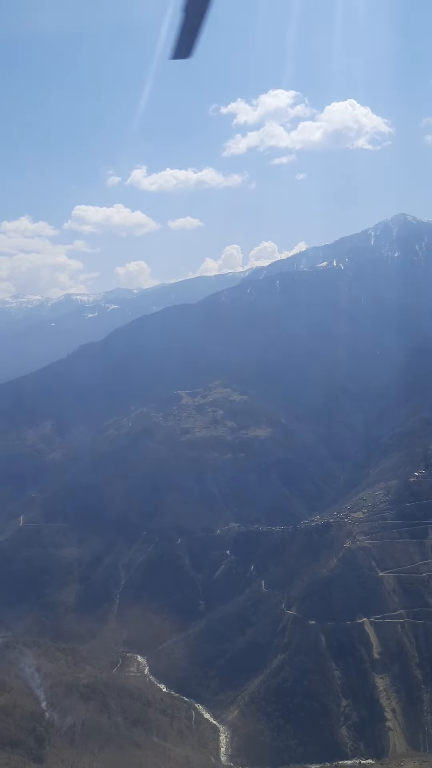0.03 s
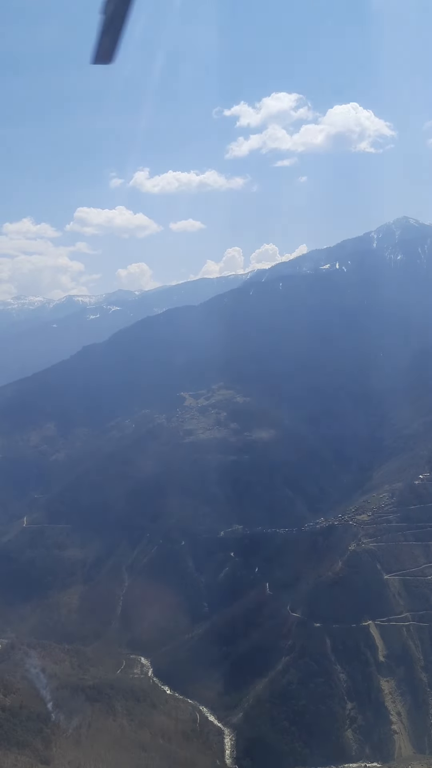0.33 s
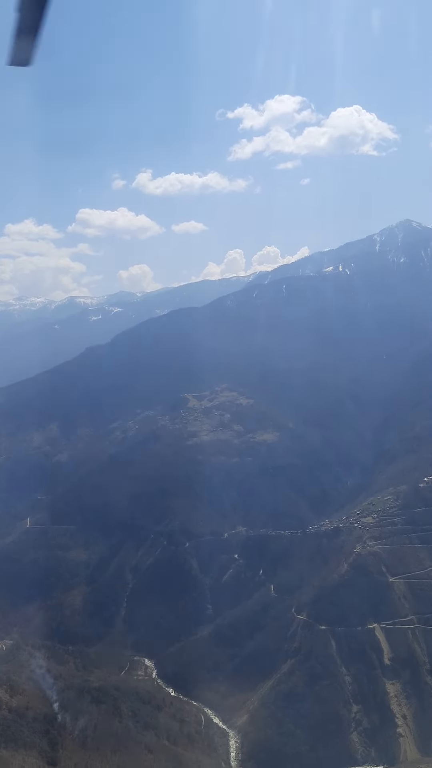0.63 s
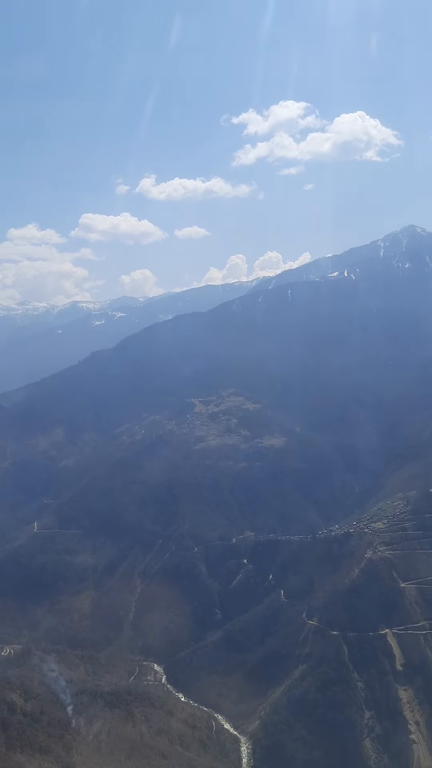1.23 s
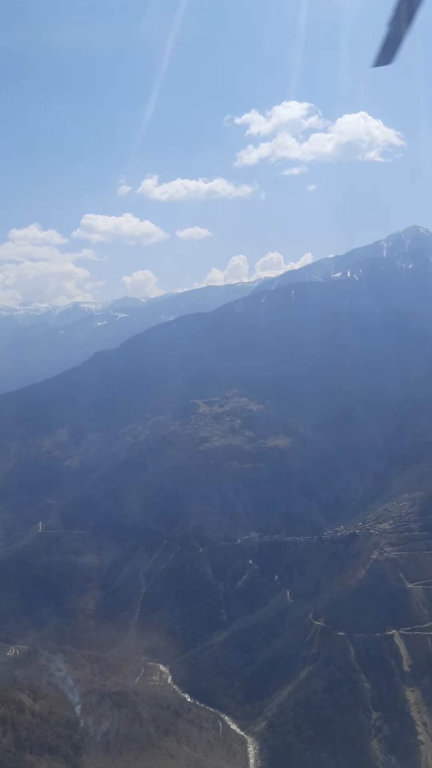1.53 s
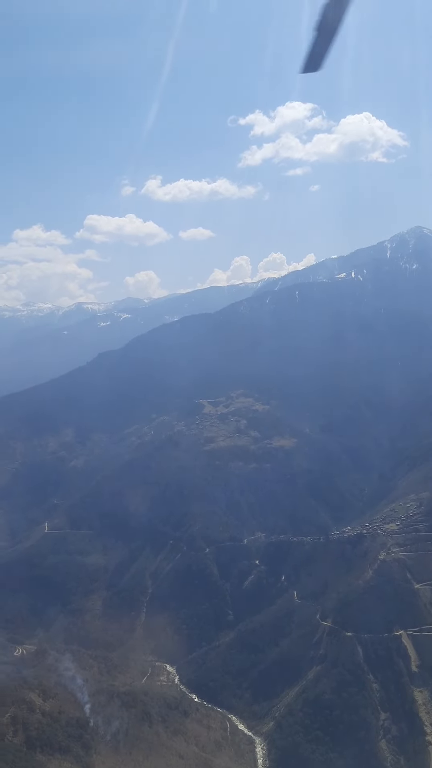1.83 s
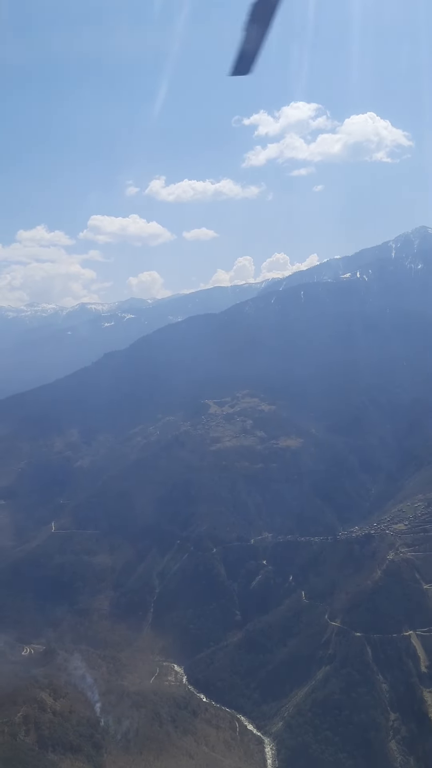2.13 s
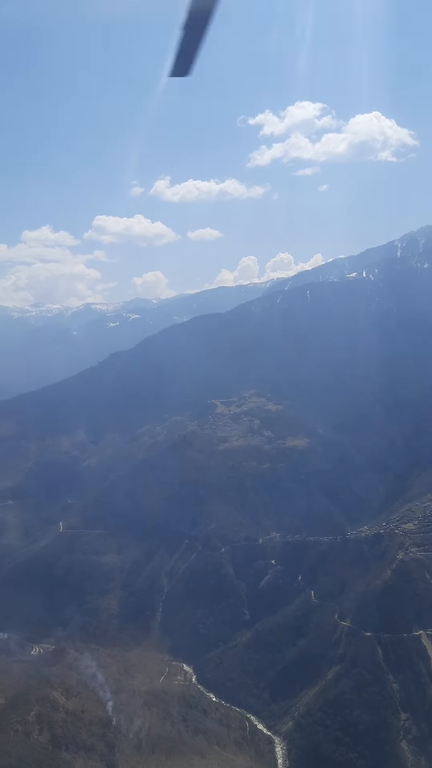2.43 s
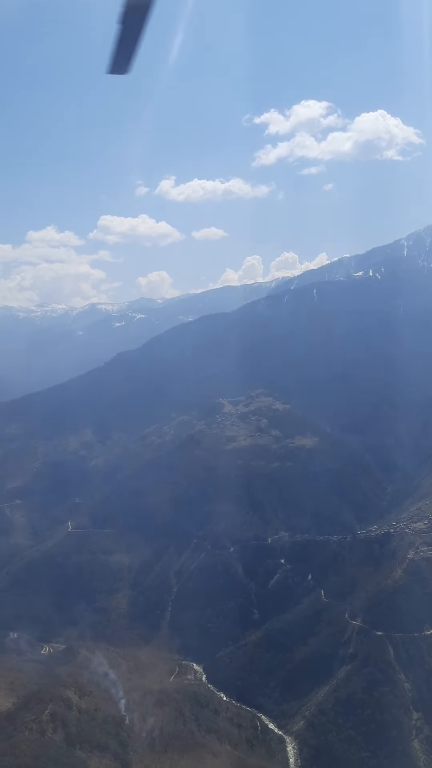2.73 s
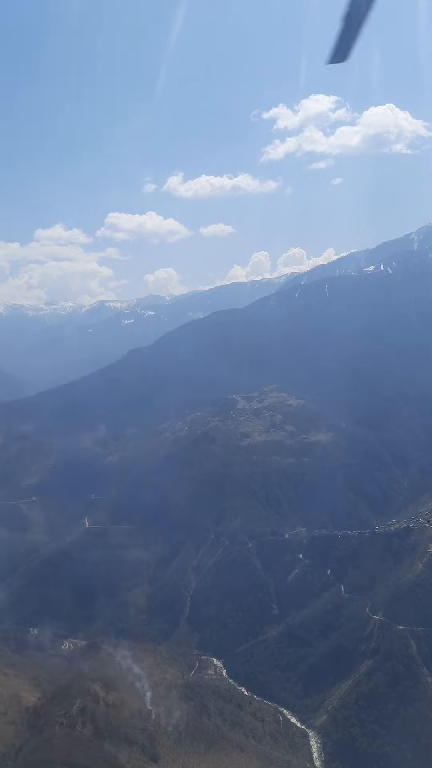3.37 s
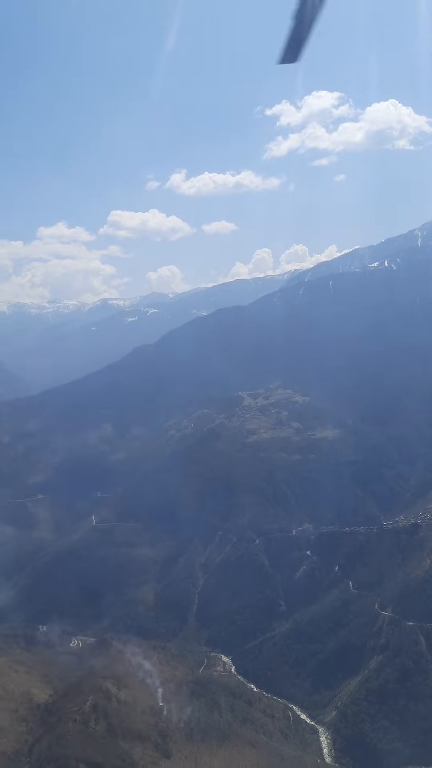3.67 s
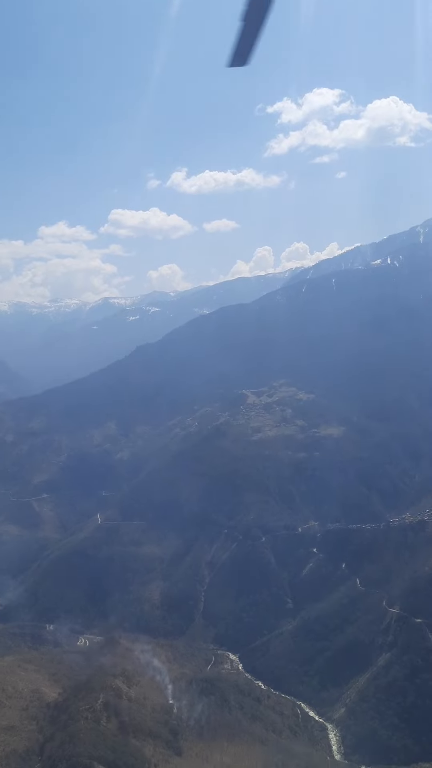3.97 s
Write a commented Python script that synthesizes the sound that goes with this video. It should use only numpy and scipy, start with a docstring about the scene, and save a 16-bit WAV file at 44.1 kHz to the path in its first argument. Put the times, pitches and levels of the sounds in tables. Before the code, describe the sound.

Helicopter rotor and engine noise fills the cabin throughout, with rapid blade beats, a deep airflow roar and thin turbine whistles. A constant high whine is strongest at first, then eases as the rotor speeds up a little.

```python
"""A helicopter's main rotor, heard from the cabin in level flight. It throbs, and each blade adds a slap
and a swish. The rotor drive whines loudly and speeds up a little. Airflow roars on the fuselage,
the cabin drones, the gears hum and pulse, and the turbine adds thin whistles that drift with its
own speed."""
import sys
import numpy as np
from scipy.fft import rfft, irfft, next_fast_len
from scipy.io import wavfile
from scipy.ndimage import map_coordinates

SR = 44100
rng = np.random.default_rng(int(sys.argv[2]) if len(sys.argv) > 2 else 0)


def transcribe(u):
    """Save the signal u as a 16-bit wav file named by the first command-line argument.

    u: samples, shape (n,) or (channels, n), limited to [-1, 1]; the rate is SR.
    q: integer samples, one column per channel.
    """
    v = np.clip(np.atleast_2d(u).T, -1, 1)
    q = np.round(v * 32767).astype(np.int16)
    wavfile.write(sys.argv[1], SR, q)


N = 176400

SPEED_UP_S = (1.7, 2.5)  # start, end of the drive tones' level change
# rotor drive whine, tracks shaft speed: time_s, pitch_hz
DRIVE_PITCH = [(0, 2188), (.6, 2188), (1.1, 2182), (1.6, 2188), (2.1, 2193), (2.6, 2203), (3.1, 2208),
               (3.6, 2201), (4, 2210)]


def main_rotor():
    """Blade-pass harmonics, plus a pressure pulse and a swish of air per blade."""
    # throb: harmonic, level_db
    harmonics = [(2, -61), (3, -44.5), (4, -28), (5, -28.5), (6, -32), (7, -28), (8, -27.5), (9, -32),
                 (10, -41), (11, -37.5), (12, -43), (13, -29.5)]
    # swish spectrum: freq_hz, density_db
    swish_spectrum = [(40, -56), (100, -30), (250, -22), (350, 1.5), (450, 12), (560, -13.5), (800, -3),
                      (2000, -50), (5000, -120)]
    # slap and swish envelope: time_s, gain_db
    blade_gain = [(0, 1), (.8, 1), (1.5, 1.5), (2.5, .5), (3.2, -.5), (4, -1.5)]
    start_blade_hz, first_slap_s, swish_half_width_s = 16.255, .033, .006
    slap_hz, slap_width_s, jitter_s, scatter_db = 395, .0042, .0005, 1.3
    passes = (drive_time() - first_slap_s) * start_blade_hz
    throb = sum(tone(2 * np.pi * k * passes + .29 * wobble(4.26), db - wobble(6.1), -2.4, -.15)
                for k, db in harmonics)
    blade = np.round(passes).astype(int)
    from_blade_s = (passes - blade) / start_blade_hz
    early, size = rng.standard_normal((N // 1000, 2))[blade].T  # one draw per blade
    window = np.exp(-(from_blade_s / slap_width_s) ** 2)
    burst = window * np.sin(2 * np.pi * slap_hz * (from_blade_s + jitter_s * early))
    slap = amp(-16.5 + scatter_db * size) * burst
    swish = amp(-32) * unit(cabin_noise(swish_spectrum) / (1 + (from_blade_s / swish_half_width_s) ** 2))
    return throb + amp(curve(blade_gain)) * (slap + swish)


def drive_whine():
    """Loud whine and side tones locked to shaft speed; most side tones swell as it rises."""
    # whine envelope: time_s, level_db
    whine_level = [(0, -27), (.6, -28), (1.15, -29), (1.6, -26), (1.95, -28), (2.4, -33.5), (2.7, -36.5),
                   (3.15, -37.5), (3.53, -32), (3.8, -37), (4, -41.5)]
    # whine balance: time_s, left_minus_right_db
    whine_pan = [(0, 0.5), (.9, -2), (1.6, 0.5), (2.5, -2.5), (3.1, -9), (3.53, 0), (4, -15)]
    # tones around the speed-up: start_hz, before_db, after_db, pan_db, ear_phase_rad
    side_tones = [(506.5, -42, -35, 0, .3), (689.3, -42, -36, -1.5, .5), (1013, -46, -48, -9, 1.5),
                  (2718, -59, -48.5, 0, .5), (2775, -52, -46, 0, .5), (3386, -56, -46.5, 2, 1.2),
                  (3470, -58, -55, 0, 1)]
    pitch_hz = curve(DRIVE_PITCH)
    whine = machine_tone(pitch_hz, curve(whine_level), curve(whine_pan), .034,
                         swing_db=.6, wander_rad=.06, flutter=.03)
    return whine + sum(
        machine_tone(hz * pitch_hz / pitch_hz[0], ramp(SPEED_UP_S, [before, after]), pan, ear_phase,
                     swing_db=1.5, wander_rad=.27, flutter=.41 * np.sqrt(hz / pitch_hz[0]))
        for hz, before, after, pan, ear_phase in side_tones)


def airflow():
    """Turbulent roar on the fuselage and a smooth hiss."""
    # roar spectrum: freq_hz, density_db
    roar_spectrum = [(15, -40), (30, -34), (38, -17), (48, -5), (70, -8.5), (115, 1), (165, -5), (215, -4),
                     (290, -8), (350, -13), (450, -18.5), (560, -19.5), (700, -22.5), (1000, -27.5),
                     (1600, -46), (5000, -120)]
    # roar envelope: time_s, level_db
    roar_level = [(0, -15), (.7, -15.5), (1.3, -13.5), (2, -15.5), (2.7, -13.7), (3.2, -15), (4, -15)]
    # hiss spectrum: freq_hz, density_db
    hiss_spectrum = [(500, -23), (900, 4), (1500, -1), (1800, -1.5), (2150, 3), (2650, -4.5), (3200, -6),
                     (4100, -7.5), (5500, -18), (7200, -17), (9800, -24), (11000, -15.5), (13500, -27),
                     (15000, -26), (15700, -34)]
    left_lag_s = .00014
    roar = amp(curve(roar_level) + .55 * wobble(22.25)) * cabin_noise(roar_spectrum)
    roar = filtered(roar, lambda hz: np.exp(np.outer([-1j, 1j], np.pi * hz * left_lag_s)))
    hiss = amp(-33 + .64 * wobble(12)) * cabin_noise(hiss_spectrum)
    return roar + hiss


def cabin_drone():
    """Two low tones that swell and recede."""
    # drone envelopes: time_s, lower_db, upper_db
    envelopes = [(0, -29.5, -36), (.8, -25, -27), (1.6, -24, -26.5), (2.6, -25.5, -23.5),
                 (3.1, -31.5, -35.5), (4, -27, -32)]
    pitches_hz = (255.1, 293.2)
    time_s, *levels_db = np.transpose(envelopes)
    return sum(machine_tone(hz, ramp(time_s, db), 0, .69, swing_db=1.2, wander_rad=.63, flutter=.13)
               for hz, db in zip(pitches_hz, levels_db))


def gearbox():
    """Gear and tail rotor hums, with a slowly beating mesh tone."""
    # hums: pitch_hz, level_db, pan_db, ear_phase_rad
    hums = [(57, -36, -2, 0), (114, -32.5, -2, 0), (930, -51, 0, 1), (1859, -53, 0, 1), (1906, -56, 0, 1),
            (1938, -57, 0, 1), (2137, -54, 0, 1), (2469, -56, 0, 1)]
    mesh_hz, beat_hz, beat_peak_s = 775.6, 1.5, .62
    beat = 1 + .35 * np.cos(2 * np.pi * beat_hz * (clock() - beat_peak_s))
    mesh = beat * machine_tone(mesh_hz, -35.5, .4, .52, swing_db=1.5, wander_rad=.23, flutter=.25)
    return mesh + sum(machine_tone(*hum, swing_db=2, wander_rad=.81, flutter=.13) for hum in hums)


def pulsing_gears():
    """Mesh tones that swell once per turn of their shafts."""
    # tones around the speed-up: start_hz, before_db, after_db, pan_db, shaft_hz
    mesh_tones = [(1031, -46, -39.5, -8, 18.4), (1372, -48, -49, 1, 17.4)]
    drive_s = drive_time()
    gears = np.zeros((2, N))
    for hz, before, after, pan, shaft_hz in mesh_tones:
        pulse = 1 + .8 * np.cos(2 * np.pi * shaft_hz * drive_s)
        phase = 2 * np.pi * hz * drive_s + .66 * wobble(18)
        level_db = ramp(SPEED_UP_S, [before, after]) + wobble(9)
        gears += pulse * tone(phase, level_db, pan, .72)
    return gears


def turbine():
    """Thin whistles that drift together with turbine speed and fade in and out."""
    # main whistle: time_s, pitch_hz
    whistle_pitch = [(0, 6955), (.6, 6964), (1.2, 6967), (1.65, 7023), (2.1, 7020), (2.6, 6997),
                     (3.1, 6955), (3.6, 6958), (4, 7000)]
    # strong whistles: start_hz, pan_db, ear_phase_rad
    whistles = [(1577, 0, 1), (4461, -3.5, 1.9), (6959, 0, .3), (10805, 3, 1.4)]
    # their envelopes: time_s, then level_db per whistle, low to high
    envelopes = [(0, -49, -51, -65, -63), (.7, -47, -44.5, -61, -55), (1.15, -49, -47, -55, -52),
                 (1.7, -47, -54, -57, -57), (2.15, -50, -49, -56, -52), (2.8, -57, -55, -61, -61),
                 (3.15, -58, -50, -65, -62), (3.5, -58, -44, -61, -64), (4, -58, -44, -61, -56)]
    # faint whistles: start_hz, level_db, pan_db, ear_phase_rad
    faint_whistles = [(1128, -49.5, 0, 1), (8922, -60, -2, 1.9), (9305, -64, 0, 1.7), (11425, -64, 0, 1.5),
                      (13370, -70, 0, 1.5), (13915, -69, 0, 1.5)]
    pitch_hz = curve(whistle_pitch)
    speed = pitch_hz / pitch_hz[0]
    time_s, *levels_db = np.transpose(envelopes)
    strong = sum(machine_tone(hz * speed, ramp(time_s, db), pan, ear_phase,
                              swing_db=1, wander_rad=.71, flutter=.23)
                 for (hz, pan, ear_phase), db in zip(whistles, levels_db))
    faint = sum(machine_tone(hz * speed, db, pan, ear_phase, swing_db=1.2, wander_rad=.51, flutter=.12)
                for hz, db, pan, ear_phase in faint_whistles)
    return strong + faint


def drive_time():
    """Seconds counted at the speed of the rotor drive."""
    pitch_hz = curve(DRIVE_PITCH)
    return np.cumsum(pitch_hz / pitch_hz[0]) / SR


def cabin_noise(spectrum):
    """Stereo noise of rms 1, coherent in the bass, diffuse in the treble."""
    # likeness between the ears: freq_hz, correlation
    coherence = [(30, 0.92), (70, 0.86), (130, 0.94), (250, 0.49), (500, 0.49), (1000, -0.45),
                 (2000, -0.14), (4000, -0.16), (8000, -0.062), (14000, 0.087)]
    # cabin balance: freq_hz, left_minus_right_db
    balance = [(30, -12), (80, 0), (160, -3), (350, 0.6), (700, -.2), (1500, -1.5), (2500, 2), (4500, -5),
               (8000, 0.5), (13000, 3.5)]

    def mid_side_gains(hz):
        angle = np.arccos(np.clip(log_interp(coherence, hz), -1, 1)) / 2
        return amp(log_interp(spectrum, hz)) * [np.cos(angle), np.sin(angle)]

    mid, side = filtered(rng.standard_normal((2, N)), mid_side_gains)
    ears = np.array([mid + side, mid - side])
    return unit(filtered(ears, lambda hz: amp(np.outer([.5, -.5], log_interp(balance, hz)))))


def machine_tone(hz, db, pan_db, ear_phase_rad, swing_db, wander_rad, flutter):
    """Tone with slow drift and fast flutter, both in phase and level."""
    phase = 2 * np.pi * np.cumsum(hz * np.ones(N)) / SR + wander_rad * wobble(6) + flutter * wobble(60)
    fade_db = swing_db * np.array([wobble(4.76), wobble(5.04)]) / 2 + swing_db * wobble(14)
    return tone(phase, db + fade_db, pan_db, ear_phase_rad) * (1 + flutter * wobble(45))


def tone(phase, db, pan_db, ear_phase_rad):
    """Stereo sine; pan and ear phase are left minus right."""
    ears = np.array([[.5], [-.5]])
    peak = np.sqrt(2) * amp(db + ears * pan_db)
    return peak * np.sin(phase + ears * ear_phase_rad + rng.uniform(0, 2 * np.pi))


def amp(db):
    """Decibels to gain."""
    return 10 ** (np.asarray(db) / 20)


def unit(x):
    """Scale to rms 1."""
    return x / np.sqrt(np.mean(x ** 2) + 1e-20)


def log_interp(points, hz):
    """Interpolate (freq_hz, value) rows on a log axis."""
    freq_hz, values = np.transpose(points)
    return np.interp(np.log(hz + 1), np.log(freq_hz + 1), values)


def clock():
    """Sample times in seconds."""
    return np.arange(N) / SR


def ramp(time_s, values):
    """Linear interpolation to one value per sample."""
    return np.interp(clock(), time_s, values)


def curve(rows):
    """Ramp through (time_s, value) rows."""
    return ramp(*np.transpose(rows))


def wobble(knots_per_s):
    """Smooth random curve."""
    return map_coordinates(rng.standard_normal(400), [clock() * knots_per_s + 2], mode="wrap")


def filtered(x, response):
    """FFT filter with gain response(hz)."""
    size = next_fast_len(N + SR // 2)
    return irfft(rfft(x, size) * response(np.fft.rfftfreq(size, 1 / SR)), size)[..., :N]


def scene():
    """Stereo sum in the cabin."""
    return (main_rotor() + airflow() + gearbox() + cabin_drone()
            + drive_whine() + pulsing_gears() + turbine())


def record(dry):
    """Soft peak limit, then a brick-wall low-pass."""
    ceiling, cutoff_hz = .98, 15700
    rounded = dry / (1 + (dry / ceiling) ** 8) ** (1 / 8)
    return filtered(rounded, lambda hz: hz < cutoff_hz)


dry = scene()
out = record(dry)
transcribe(out)
```